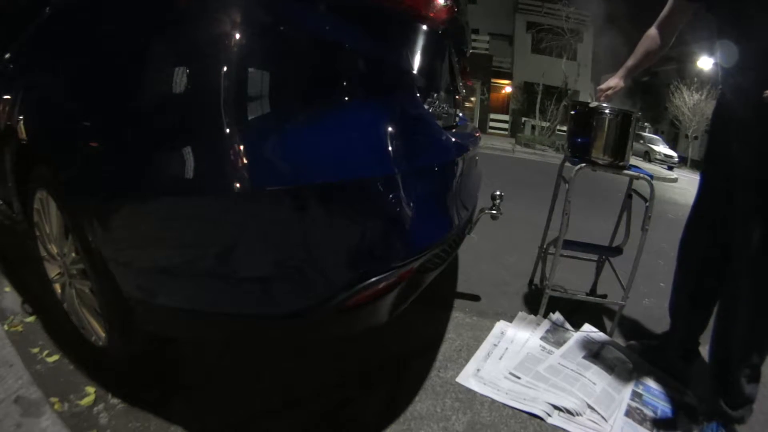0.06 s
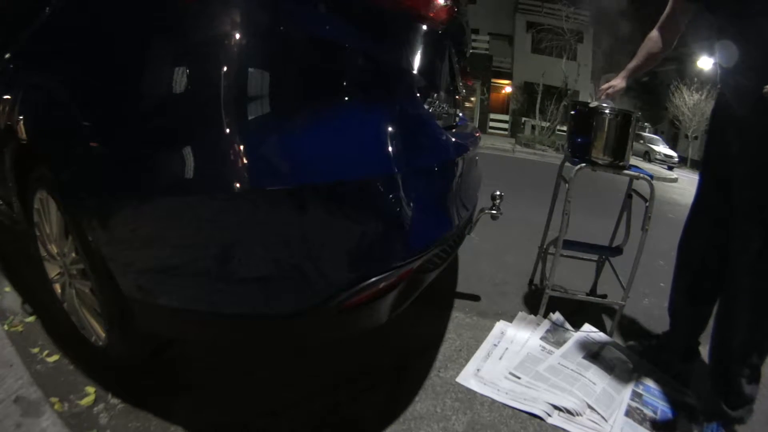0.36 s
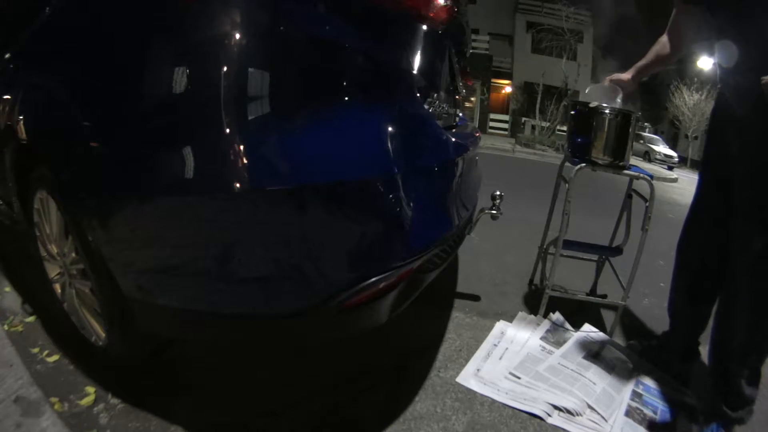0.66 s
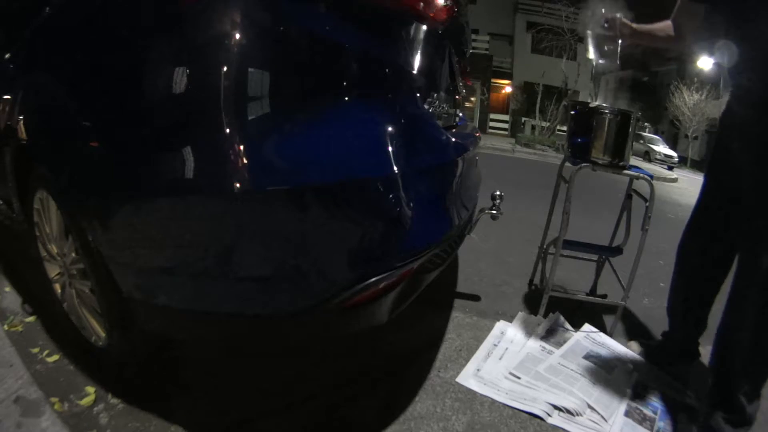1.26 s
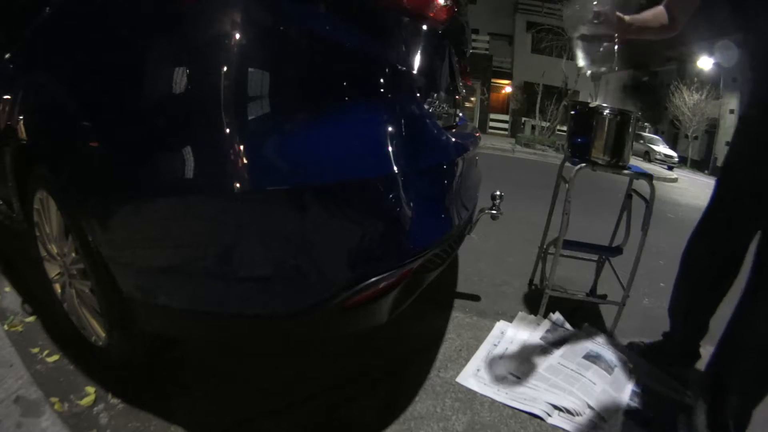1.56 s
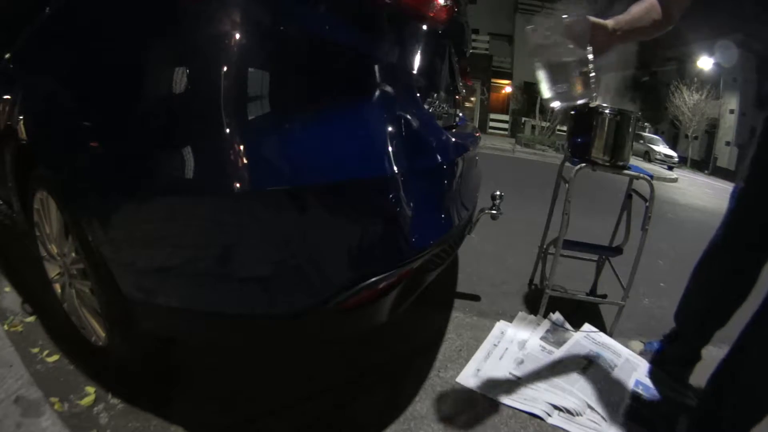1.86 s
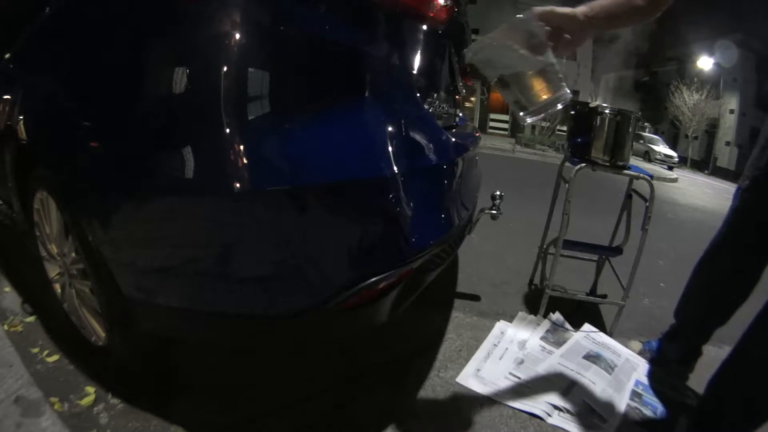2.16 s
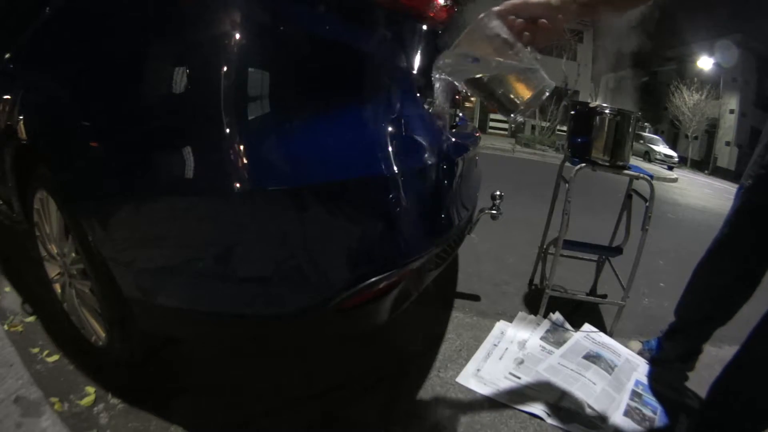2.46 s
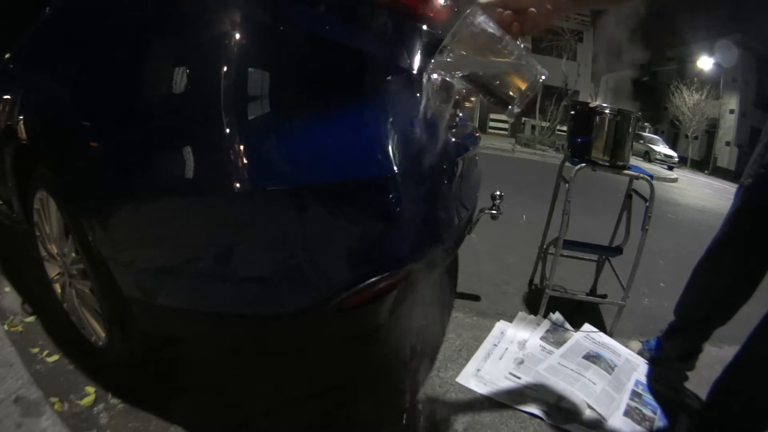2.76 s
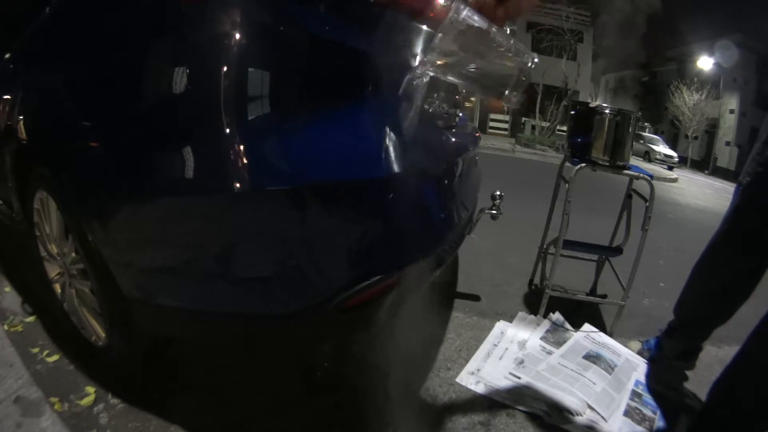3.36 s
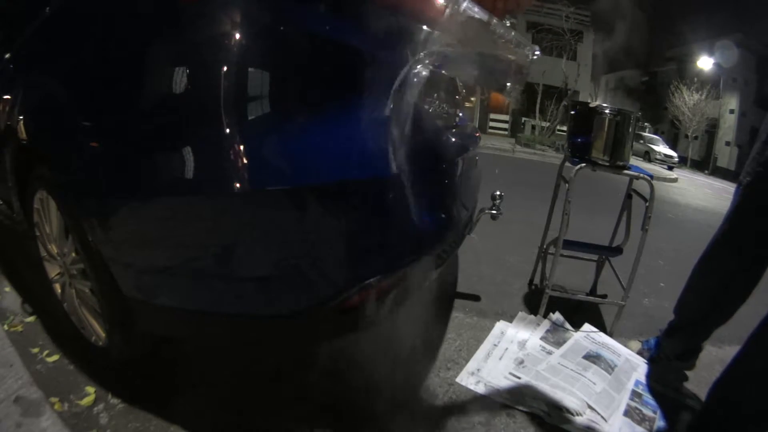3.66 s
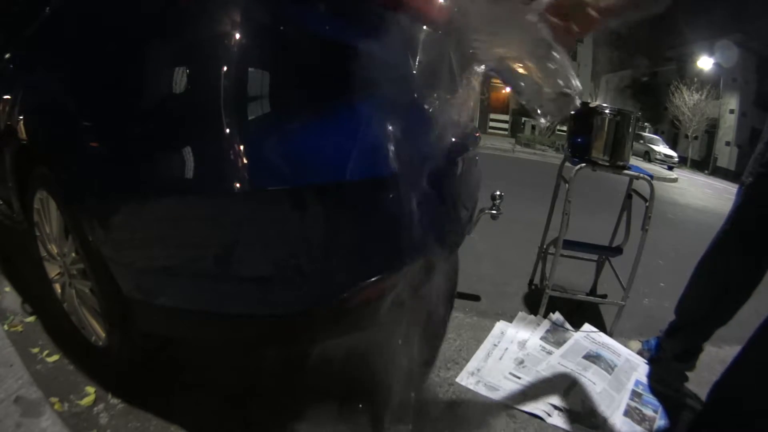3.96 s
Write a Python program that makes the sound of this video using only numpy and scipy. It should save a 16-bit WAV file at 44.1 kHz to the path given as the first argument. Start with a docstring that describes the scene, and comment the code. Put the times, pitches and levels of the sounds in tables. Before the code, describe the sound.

Water pouring onto a car bumper is the main sound. A quiet street hush comes first, with faint whines and soft jug swishes from about 0.7 seconds. A few drips fall between 1.6 and 1.9 seconds. A first slop lands at 2.4. From 2.6 to 4 seconds the stream grows louder, spattering on panel and asphalt with sharp drops, fine spray, small plops and soft thuds.

```python
"""A quiet night street hushes, with faint thin whines. A jug swishes as it is lifted, and drips.
A first slop lands on a car's bumper, then the stream grows and spatters on panel and asphalt:
sharp single drops over a dense patter and a fine spray. Trapped air rings as small bubbles and
a few hollow plops; the plastic panel drums and thuds. Car body and house fronts add a thin echo."""
import sys
import numpy as np
from scipy import signal
from scipy.fft import rfft, irfft, next_fast_len
from scipy.io import wavfile
from scipy.ndimage import uniform_filter1d, map_coordinates

SR = 44100
rng = np.random.default_rng(int(sys.argv[2]) if len(sys.argv) > 2 else 0)


def transcribe(signal):
    """Save signal, clipped to [-1, 1], as a 16-bit WAV file at the path in sys.argv[1]."""
    frames = np.atleast_2d(signal).T
    limited = np.clip(frames, -1, 1)
    pcm = np.round(limited * 32767).astype(np.int16)
    wavfile.write(sys.argv[1], SR, pcm)


N = 176400

# Street hush: f/Hz, relative density/dB
STREET_SPECTRUM = [(15, -42), (25, -14), (43, -8.5), (110, -5), (173, -8), (296, -6.5), (400, -7),
                   (900, -7), (1170, -5), (1350, -7), (1900, -8), (2330, -4.5), (2650, -8), (3000, -12.5),
                   (3900, -14.5), (5100, -14), (6000, -16.5), (9400, -20), (11000, -21), (14300, -75)]
# Street and panel drumming: f/Hz, left-right correlation
STREET_CORRELATION = [(40, 0.57), (120, 0.9), (250, 0.071), (500, -0.39), (1000, -0.42), (2300, 0.008),
                      (5000, 0.11), (10000, 0.55)]
# Background whines: start/s, end/s, first f/Hz, last f/Hz, level/dB
WHINES = [(0.0, 1.35, 1201, 1102, -71), (1.49, 1.595, 2300, 2210, -58.5), (1.83, 2.06, 2650, 2465, -67)]
# Jug handling: t/s, length/s, level/dB
SWISHES = [(0.746, 0.043, -63), (.81, 0.18, -64.5), (0.858, 0.029, -61), (1.393, 0.029, -66),
           (1.517, 0.14, -62), (1.988, 0.49, -64), (2.246, 0.034, -66.5)]
# Jug swish: f/Hz, relative density/dB
SWISH_SPECTRUM = [(300, -31), (1700, -30), (2350, 2), (3000, -5), (3900, -5), (5000, 1), (6000, -9.5),
                  (9000, -20)]
# Swishes and spray: f/Hz, left-right correlation
WATER_CORRELATION = [(300, 0.36), (1000, -0.21), (2300, 0.78), (5000, 0.88), (10000, 1)]
# Drips off the jug: t/s, level/dB, treble tilt/dB
DRIPS = [(1.587, -33.5, -3), (1.5896, -48, -2), (1.63, -41.5, -3), (1.641, -52, -2), (1.683, -50, 2),
         (1.6881, -36, 4), (1.6981, -40, 5), (1.713, -50, 0), (1.909, -42.5, 29)]
# Drip impact: f/Hz, relative density/dB
DRIP_SPECTRUM = [(100, -39), (1000, -20), (1700, -10), (2400, 4), (3400, -1), (4300, -3.5), (5200, 0.5),
                 (6200, -11), (8000, -11), (9200, -22), (10300, -12), (11000, -21)]
# Drop brightness: f/Hz, share of treble tilt
TILT_SHAPE = [(2600, -0.41), (8500, 0.41)]
# Air pockets: t/s, level/dB, f/Hz, width/octaves, T60/s
PLOPS = [(2.38, -43, 1090, 0.13, .08), (2.383, -50.5, 1337, 0.056, 0.24), (3.369, -40, 1600, 0.092, 0.068),
         (3.427, -26, 2930, 0.16, 0.0098), (3.677, -24, 2580, 0.11, 0.017),
         (3.747, -30, 2530, 0.083, 0.028), (3.878, -21, 2720, 0.41, 0.022)]
# Flow of the first slop: t/s, level/dB
SLOP_FLOW = [(2.385, -68), (2.399, -44.5), (2.436, -39), (2.455, -47.5), (2.52, -63.5), (2.6, -64)]
# Flow of the pour: t/s, level/dB
POUR_FLOW = [(2.6, -73), (2.636, -48.5), (2.715, -46.5), (2.785, -53), (2.82, -46), (2.93, -42),
             (2.97, -44.5), (3.03, -45.5), (3.08, -41), (3.11, -44.5), (3.19, -45.5), (3.28, -40),
             (3.46, -39.5), (3.64, -37), (3.705, -40.5), (3.86, -33), (3.945, -39), (4.0, -35)]
# Heavy drops of slop and pour: t/s, level/dB, treble tilt/dB
HEAVY_DROPS = [(2.399, -40, 37), (2.432, -41.5, -8), (2.4405, -34.5, 14), (2.515, -52, 10),
               (2.6463, -40, -4), (2.7625, -42.5, 10), (2.7998, -30, 41), (2.8158, -34, 3),
               (2.861, -35.5, 12), (2.9039, -35, 17), (2.918, -33.5, 14), (2.923, -28, 7), (2.925, -37, 9),
               (2.9923, -27, 29), (3.0578, -25, 6), (3.0595, -27.5, 17), (3.085, -33, 23), (3.12, -33, 8),
               (3.2064, -36.5, 13), (3.2222, -32.5, 4), (3.2244, -33, 10), (3.2413, -25.5, 16),
               (3.245, -32, 19), (3.2507, -30, -8), (3.2675, -36, 12), (3.2717, -31, 1), (3.292, -29.5, 23),
               (3.313, -26, -1), (3.3353, -33, 21), (3.3488, -27.5, -12), (3.3887, -30, -13),
               (3.4023, -37, 17), (3.4104, -23.5, 23), (3.4187, -25.5, -5), (3.44, -33, -4),
               (3.468, -27.5, -1), (3.5025, -31.5, -2), (3.5057, -27, 7), (3.5125, -27.5, 2),
               (3.5431, -30, 4), (3.558, -30.5, 9), (3.5731, -28, 4), (3.5796, -28.5, 16), (3.599, -28, 1),
               (3.6283, -30.5, -9), (3.6341, -22.5, 2.5), (3.6469, -25.5, 3), (3.6809, -19, 14),
               (3.78, -27.5, -3), (3.8125, -25, -4), (3.8162, -19.5, -2.5), (3.8227, -26.5, 2),
               (3.8375, -25, 13), (3.84, -24, 19), (3.8556, -16, -4), (3.8756, -38, 19), (3.904, -26.5, 13),
               (3.9218, -26, 11), (3.9914, -27, -2)]
# Water on a hard surface: f/Hz, relative density/dB
SPLAT_SPECTRUM = [(100, -32.5), (600, -45.5), (1300, -24), (1950, -11.5), (2450, -1), (3400, -4.5),
                  (4400, 1), (5150, 6), (6200, -3.5), (7300, -4), (8200, -8.5), (9200, -17), (10200, -3.5),
                  (11000, -6.5)]
# Fine spray: f/Hz, relative density/dB
SPRAY_SPECTRUM = [(100, -17), (700, -15), (1500, -7), (2000, -7), (2400, 1), (3300, -8.5), (4300, -10),
                  (5150, -8.5), (6200, -11), (7500, -5.5), (9200, -14), (10200, -4), (11000, -10.5)]
# Panel under the stream: f/Hz, relative density/dB
DRUM_SPECTRUM = [(30, -11), (85, 4.5), (160, 6), (300, 2), (700, -6), (1500, -26)]
# Gushes on the panel: t/s, level/dB
THUDS = [(3.297, -38.5), (3.33, -46), (3.367, -40), (3.511, -48)]
# Panel thud: f/Hz, relative density/dB
THUD_SPECTRUM = [(100, -25), (240, 0), (450, -2.5), (800, 3.5), (1300, -1.5), (1700, 1), (2600, -20)]

TOP_HZ = 11150
MEAN_FLOW_DB = np.mean(np.transpose(POUR_FLOW)[1])
TIME_S = np.arange(N) / SR


def amp(db):
    """Decibels to gain."""
    return 10 ** (np.asarray(db) / 20)


def unit(x):
    """Scale to rms 1."""
    return x / np.sqrt(np.mean(x ** 2) + 1e-20)


def along(points, hz):
    """Read (f/Hz, value) points on a log axis."""
    f, v = np.transpose(points)
    return np.interp(np.log(hz + 1), np.log(f + 1), v)


def wobble(rate_hz):
    """Smooth random curve, rate_hz knots a second."""
    return map_coordinates(rng.standard_normal(4096), [TIME_S * rate_hz], mode="wrap")


def filtered(x, response):
    """Apply a frequency response."""
    size = next_fast_len(N + SR // 4)
    return irfft(rfft(x, size) * response(np.fft.rfftfreq(size, 1 / SR)), size)[..., :N]


def stereo_noise(spectrum, correlation):
    """Coloured noise, rms 1, with a given left-right correlation."""
    def response(hz):
        angle = np.arccos(np.clip(along(correlation, hz), -1, 1)) / 2
        return amp(along(spectrum, hz)) * [np.cos(angle), np.sin(angle)]
    mid, side = filtered(rng.standard_normal((2, N)), response)
    return unit(np.array([mid + side, mid - side]))


def add(out, at_s, sound):
    """Mix in a stereo sound."""
    i = int(np.clip(round(at_s * SR), 0, N - 1))
    out[:, i:i + sound.shape[1]] += sound[:, :N - i]


def street(level_db=-56):
    """Steady hush of a town at night."""
    return amp(level_db + 0.35 * wobble(7.02)) * stereo_noise(STREET_SPECTRUM, STREET_CORRELATION)


def whines(relative_width=90 / 1201):
    """Thin fuzzy tones swell, sink in pitch and fade."""
    out = np.zeros(N)
    for start_s, end_s, first_hz, last_hz, db in WHINES:
        progress = np.clip((TIME_S - start_s) / (end_s - start_s), 0, 1)
        phase = 2 * np.pi * np.cumsum(first_hz + (last_hz - first_hz) * progress) / SR
        width_hz = relative_width * first_hz
        tone = unit(wobble(width_hz) * np.sin(phase) + wobble(width_hz) * np.cos(phase))
        out += amp(db) * np.sqrt(4 * progress * (1 - progress)) * tone
    return out


def jug():
    """Faint swishes as the jug is lifted and carried."""
    swell = sum(amp(db) * np.exp(-2 * ((TIME_S - at_s) / length_s) ** 2)
                for at_s, length_s, db in SWISHES)
    return swell * unit(amp(2.5 * wobble(150)) * stereo_noise(SWISH_SPECTRUM, WATER_CORRELATION))


def splats(times_s, gains, spectrum, treble_db, ripple_db, pan_db, scatter_db, scatter_t60_s=0.027):
    """Each impact: a snap of its own colour, then a short burst of scattered droplets."""
    count, size = len(times_s), 1024
    hz, t = np.fft.rfftfreq(size, 1 / SR), np.arange(size) / SR
    ripple = rng.standard_normal((count, len(hz)))
    ripple = unit(uniform_filter1d(uniform_filter1d(ripple, 24), 16))
    colour = amp(along(spectrum, hz) + treble_db[:, None] * along(TILT_SHAPE, hz) + ripple_db * ripple)
    colour /= np.sqrt(1 + (hz / TOP_HZ) ** 30)
    # Minimum phase keeps the attack sharp.
    cepstrum = irfft(np.log(colour + 1e-5))
    causal = np.r_[1, np.full(size // 2 - 1, 2), 1, np.zeros(size // 2 - 1)]
    snap = np.exp(rfft(cepstrum * causal))
    snap /= np.sqrt(np.mean(abs(snap) ** 2, axis=1, keepdims=True))
    fade = amp(-60 * t / scatter_t60_s) * (1 - np.exp(-t * 2000))
    noise = rng.standard_normal((count, 2, size))
    droplets = noise[:, :1] + 0.32 * noise[:, 1:] * [[1], [-1]]  # mid + side
    impact = amp(scatter_db) * fade / np.linalg.norm(fade) * droplets
    impact[:, :, 0] += amp(pan_db * rng.standard_normal((count, 1)) * [1, -1])  # the strike
    out = np.zeros((2, N))
    for at_s, gain, sound in zip(times_s, gains, irfft(rfft(impact) * snap[:, None])):
        add(out, at_s, gain * sound)
    return out


def single_drops(table, spectrum, scatter_db):
    """Large drops land, heard one by one."""
    times_s, db, treble_db = np.transpose(table)
    gains = amp(db) * np.sqrt(SR * 0.0014)  # energy of 1.4 ms at that level
    return splats(times_s, gains, spectrum, treble_db, ripple_db=2, pan_db=1.6, scatter_db=scatter_db)


def echo(x, level_db=-14, t60_s=0.11, delay_s=0.004):
    """Thin tail off car body and house fronts."""
    t = np.arange(SR // 3) / SR
    tail = rng.standard_normal((2, len(t))) * amp(-60 * t / t60_s) * (t > delay_s)
    return amp(level_db) * signal.fftconvolve(x, tail / np.linalg.norm(tail[0]), axes=1)[:, :N]


def plops(size=8192):
    """Larger air pockets: a short push dies away in one resonance."""
    out, t, hz = np.zeros((2, N)), np.arange(size) / SR, np.fft.rfftfreq(size, 1 / SR)
    for at_s, db, pitch_hz, width_oct, t60_s in PLOPS:
        band = 1 / (1 + (np.log2((hz + 1) / pitch_hz) / width_oct) ** 4)
        ring = unit(irfft(band * np.exp(2j * np.pi * rng.random((2, len(hz))))))
        envelope = amp(db - 60 * t / t60_s) * (1 - np.exp(-t * 1000))
        add(out, at_s, envelope * ring)
    return out


def flow_db(t):
    """Strength of the falling water: slop, then pour."""
    slop_db = np.interp(t, *np.transpose(SLOP_FLOW), left=-120, right=-120)
    pour_db = np.interp(t, *np.transpose(POUR_FLOW), left=-120)
    return np.maximum(slop_db, pour_db)


def patter(count=760, re_flow_db=-3.5):
    """The stream breaks into small bright drops, louder and more unequal as the flow grows."""
    start_s = SLOP_FLOW[0][0]
    span_s = N / SR - start_s
    times_s = start_s + span_s * (np.arange(count) + rng.uniform(-1, 2, count)) / count
    spread_db = np.clip(4.5 + 0.13 * (flow_db(times_s) - MEAN_FLOW_DB), 0, 12)
    sizes = unit(amp(spread_db * np.minimum(rng.standard_normal(count), 1.6)))
    gains = sizes * amp(flow_db(times_s) + re_flow_db) * np.sqrt(span_s * SR / count)
    treble_db = 9 + 12.5 * rng.standard_normal(count)
    return splats(times_s, gains, SPLAT_SPECTRUM, treble_db, ripple_db=3.5, pan_db=0.8, scatter_db=-3.5)


def spray(offset_db=-5.5, db_per_flow_db=0.69):
    """Countless droplets merge into a fluttering hiss."""
    level_db = MEAN_FLOW_DB + db_per_flow_db * (flow_db(TIME_S) - MEAN_FLOW_DB) + offset_db
    flutter = amp(2.1 * wobble(700))
    return amp(level_db) * unit(flutter * stereo_noise(SPRAY_SPECTRUM, WATER_CORRELATION))


def bumper(drum_re_flow_db=-31, attack_s=0.0011, t60_s=0.053):
    """The plastic panel drums under the stream and thuds when a gush hits."""
    blows = sum(amp(db - 60 * abs(TIME_S - at_s) / t60_s) * np.clip((TIME_S - at_s) / attack_s, 0, 1)
                for at_s, db in THUDS)
    thuds = blows * stereo_noise(THUD_SPECTRUM, correlation=[(200, 0.037), (1500, 0.24)])
    drumming = amp(flow_db(TIME_S) + drum_re_flow_db) * stereo_noise(DRUM_SPECTRUM, STREET_CORRELATION)
    return thuds + drumming


def bubbles(count=260, re_flow_db=-10, centre_hz=4980, spread_oct=0.29, decay_cycles=3.1):
    """Air trapped by the drops rings for a few cycles."""
    out, t, start_s = np.zeros((2, N)), np.arange(700) / SR, POUR_FLOW[0][0]
    for k, (jitter, pitch, strength, pan_db) in enumerate(rng.standard_normal((count, 4))):
        at_s = start_s + (N / SR - start_s) * (k + jitter) / count
        hz = np.clip(centre_hz * 2 ** (spread_oct * pitch), 2100, 8200)
        age = hz * t / decay_cycles
        ping = np.sin(2 * np.pi * hz * t) * np.exp(-age) * (1 - np.exp(-2 * age))
        ping *= np.sqrt(SR / count) / np.linalg.norm(ping)
        gain = amp(flow_db(at_s) + re_flow_db + 5.6 * min(strength, 1))
        add(out, at_s, gain * ping * amp([[pan_db], [-pan_db]]))
    return out


def scene(pan_db=0.17):
    """Pour just left of centre, drips just right, over the street."""
    drops = single_drops(HEAVY_DROPS, SPLAT_SPECTRUM, scatter_db=-8)
    pour = drops + patter() + spray() + bubbles() + plops() + bumper()
    drips = single_drops(DRIPS, DRIP_SPECTRUM, scatter_db=-6)
    water = pour * amp([[pan_db], [-pan_db]]) + drips * amp([[-pan_db], [pan_db]])
    return water + echo(water) + jug() + street() + whines()


def record(dry):
    """Steep low-pass at TOP_HZ."""
    return filtered(dry, lambda hz: 1 / np.sqrt(1 + (hz / TOP_HZ) ** 120))


dry = scene()
out = record(dry)
transcribe(out)
```